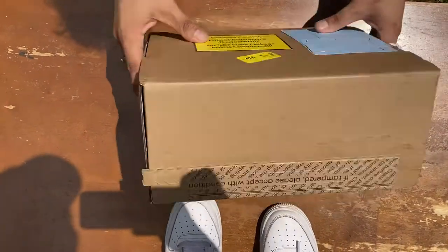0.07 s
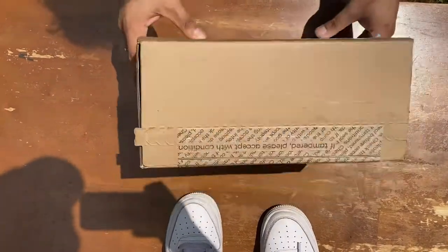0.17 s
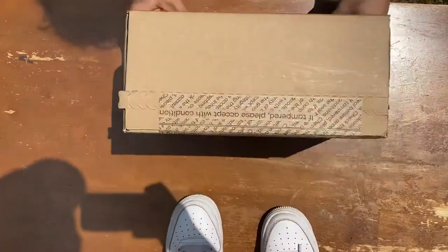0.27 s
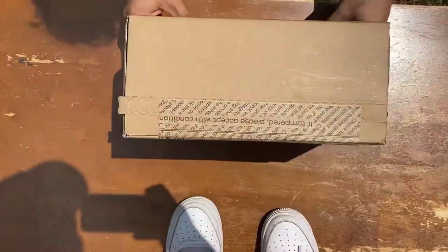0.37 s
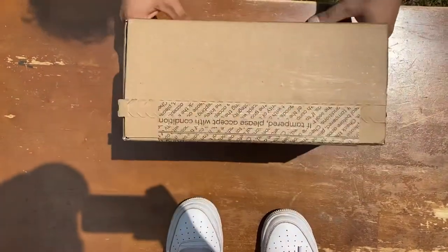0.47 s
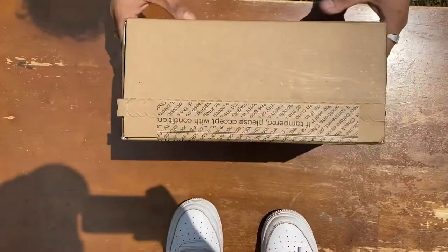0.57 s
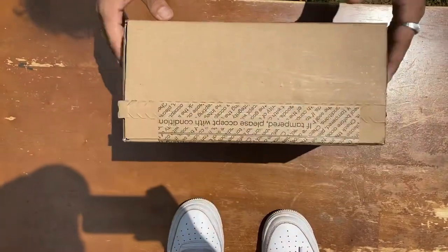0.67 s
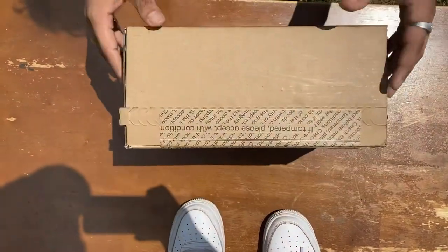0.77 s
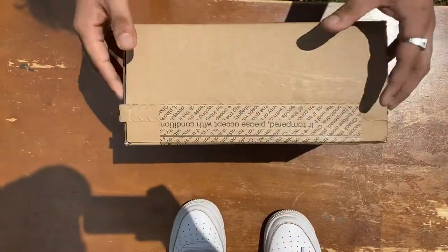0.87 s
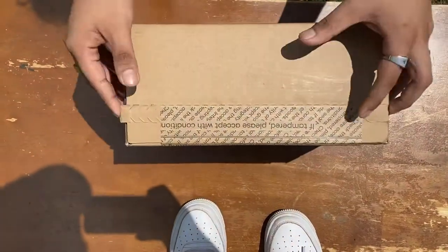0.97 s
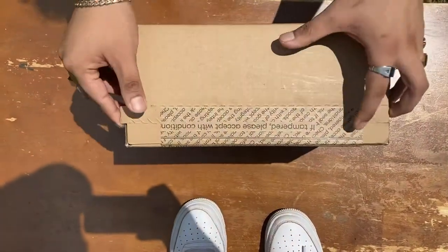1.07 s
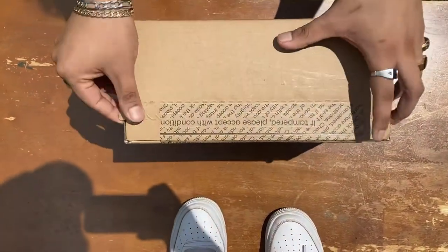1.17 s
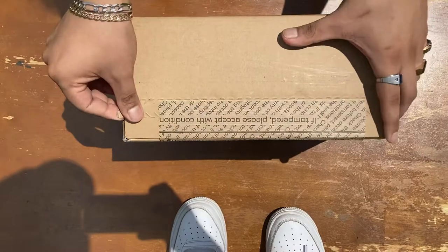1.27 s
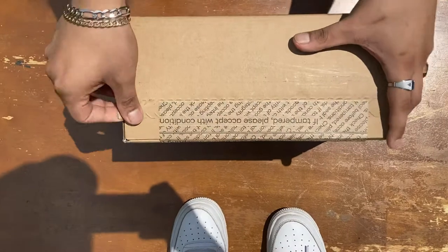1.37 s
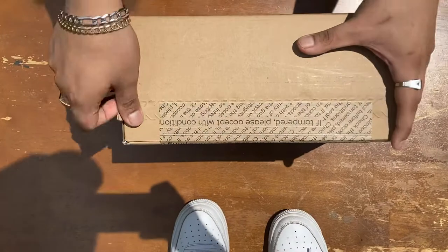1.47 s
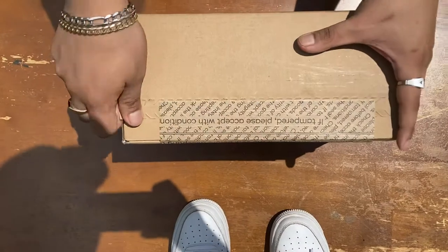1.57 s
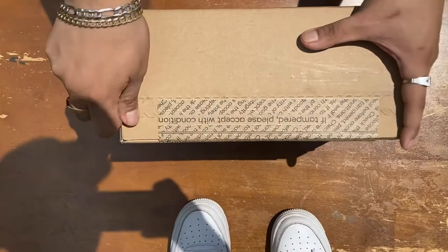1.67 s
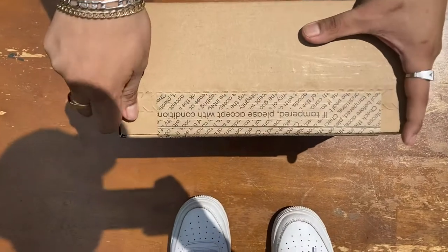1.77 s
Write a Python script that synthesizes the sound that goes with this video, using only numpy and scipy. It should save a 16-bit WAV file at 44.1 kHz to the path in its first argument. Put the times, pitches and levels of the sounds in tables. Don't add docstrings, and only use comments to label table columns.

```python
import sys
import numpy as np
from scipy import signal
from scipy.fft import rfft, irfft, next_fast_len
from scipy.io import wavfile
from scipy.ndimage import uniform_filter1d, map_coordinates

SR = 44100
rng = np.random.default_rng(int(sys.argv[2]) if len(sys.argv) > 2 else 0)


def unload_wav(signal):
    wavfile.write(
        sys.argv[1],
        SR,
        np.round(np.clip(np.atleast_2d(signal).T, -1, 1) * 32767).astype(np.int16),
    )


def gain_from_decibels(decibels):
    exponent = np.asarray(decibels, float) / 20
    return 10 ** exponent


N = 79380
TIME = np.arange(N) / SR


def unit(x):
    return x / np.sqrt(np.mean(x ** 2) + 1e-20)


def even(x, window_s):
    return x / np.sqrt(np.abs(uniform_filter1d(x ** 2, int(window_s * SR))) + 1e-6)


def along(points, hz):
    f, v = np.transpose(points)
    return np.interp(np.log(hz + 1), np.log(f + 1), v)


def closed(points, hz):
    low_end, high_end = (points[0][0] / 2, -90), (points[-1][0] * 2, -90)
    return gain_from_decibels(along([low_end, *points, high_end], hz))


def curves(rows):
    s, *columns = np.transpose(rows)
    return [np.interp(TIME, s, column) for column in columns]


def wobble(rate):
    return map_coordinates(rng.standard_normal(400), [TIME * rate])


def bell(middle_s, half_s):
    return np.exp(-((TIME - middle_s) / half_s) ** 2)


def filtered(x, response):
    m = next_fast_len(N + SR // 2)
    return irfft(rfft(x, m) * response(np.fft.rfftfreq(m, 1 / SR)), m)[..., :N]


def rush(spectrum, alike, patchy_db):
    z = signal.stft(rng.standard_normal((2, N)), nperseg=512)[2]
    field = uniform_filter1d(rng.standard_normal(z.shape[1:]), size=6, axis=0)
    field = uniform_filter1d(field, size=12, axis=1)
    pair = signal.istft(z * gain_from_decibels(patchy_db * unit(field)), nperseg=512)[1][:, :N]

    def response(hz):
        angle = np.arccos(np.clip(along(alike, hz), -1, 1)) / 2
        return closed(spectrum, hz) * [np.cos(angle), np.sin(angle)]

    mid, side = filtered(pair, response)
    return unit(np.array([mid + side, mid - side]))


# frequency in Hz, level in dB per Hz.
TOWN_SPECTRUM = [(300, 4.5), (600, -9.5), (850, -2), (1400, -8), (2300, -13), (3100, -15.5), (4500, -22),
                 (6200, -34)]
# frequency in Hz, left-right likeness from -1 to 1.
TOWN_COHERENCE = [(300, 0.31), (900, 0.077), (1500, 0.037), (4000, 0.095)]
# frequency in Hz, level in dB per Hz.
AIR_SPECTRUM = [(3000, -7), (5500, 7), (8000, 0), (11000, -3.5), (14000, -7.5), (15600, -14),
                (16000, -35.5)]
# frequency in Hz, level in dB per Hz.
VEHICLE_SPECTRUM = [(450, -3.5), (850, 3), (1150, -14)]


def distance():
    drift_db = .5
    town = gain_from_decibels(-51.5 + drift_db * wobble(5.6)) * rush(TOWN_SPECTRUM, TOWN_COHERENCE, patchy_db=.7)
    air = gain_from_decibels(-67 + drift_db * wobble(4.3)) * rush(AIR_SPECTRUM, [(100, 1)], patchy_db=1.2)
    swell = gain_from_decibels(-53.5) * bell(middle_s=1.48, half_s=0.18)
    return town + air + swell * rush(VEHICLE_SPECTRUM, TOWN_COHERENCE, patchy_db=1.0)


# time in seconds, pitch in Hz, level in dB.
WHISTLE_CURVE = [(.566, 2760, -73), (.58, 2840, -56.5), (.603, 2910, -53), (.645, 2930, -58.5),
                 (.67, 2903, -49.5), (.681, 2925, -51), (.688, 2997, -72.5), (.697, 2940, -57.5),
                 (.83, 2935, -68.5)]


def bird():
    hz, db = curves(WHISTLE_CURVE)
    phase = 2 * np.pi * np.cumsum(hz + 4 * wobble(55.3) + 22 * wobble(170)) / SR
    apart = 1.16 + 1.5 * bell(middle_s=0.639, half_s=0.03)
    ended_db = -60 * (TIME > WHISTLE_CURVE[-1][0])
    flutter_db = 4.4 * np.array([wobble(76.3), wobble(88.3)])
    return gain_from_decibels(db + ended_db + flutter_db) * np.sin([phase, phase + apart])


# time in seconds, strength in dB.
WIND_STRENGTH = [(0, -42.5), (.15, -37.5), (.32, -33), (.45, -43), (.58, -36), (.74, -43), (.8, -47.5),
                 (.95, -37.5), (1.3, -44), (1.55, -41.5), (1.8, -42)]
# middle in seconds, half length in seconds, level in dB, left-right in dB.
EDDY_EVENTS = [(0.072, 0.021, -36, -2), (0.135, 0.012, -31.5, 6), (0.165, 0.021, -39, -6),
               (0.309, 0.023, -23.5, -3), (0.352, 0.03, -30, 0), (0.496, .015, -39.5, 0),
               (0.557, 0.0095, -32.5, -5), (0.587, 0.026, -38, 4.5), (0.679, 0.011, -36.5, 3),
               (0.725, 0.01, -49, 7), (0.786, 0.016, -23.5, 9.5), (0.812, 0.011, -26, 17),
               (0.84, 0.026, -27, -1), (0.883, 0.017, -28, -4.5), (0.916, 0.016, -26.5, 3.5),
               (0.947, 0.025, -33.5, 14), (1.051, 0.016, -33, 12), (1.092, 0.011, -33, 27),
               (1.187, 0.013, -32, -5), (1.244, 0.027, -40, 15), (1.35, 0.043, -38, 19),
               (1.468, .012, -32, 16), (1.577, 0.012, -26.5, -10.5), (1.624, 0.019, -28.5, 13),
               (1.677, 0.0093, -30.5, 40), (1.771, 0.011, -33.5, 24)]
# frequency in Hz, level in dB per Hz.
RUMBLE_SPECTRUM = [(20, -34.5), (40, 4), (70, 5.5), (130, -1), (250, -13), (400, -25.5), (700, -42),
                   (1200, -41.5)]
# frequency in Hz, level in dB per Hz.
EDGE_SPECTRUM = [(120, -5), (250, 4.5), (400, -1), (700, -27.5)]


def wind():
    ports_alike = [(100, -0.49)]
    strength_db, = curves(WIND_STRENGTH)
    lumps_db = 1 * np.array([wobble(25.06), wobble(21)])
    flow = gain_from_decibels(0.5 + strength_db + lumps_db)
    ports = np.array([[.5], [-.5]])
    for s, half_s, db, pan_db in EDDY_EVENTS:
        flow = flow + gain_from_decibels(db - abs(pan_db) / 2 + ports * pan_db) * bell(s, half_s)
    rumble = even(rush(RUMBLE_SPECTRUM, ports_alike, patchy_db=2.5), window_s=0.0433)
    edges = even(rush(EDGE_SPECTRUM, ports_alike, patchy_db=4.5), window_s=0.029)
    edge_level = gain_from_decibels(-44) * (flow / gain_from_decibels(-28)) ** 1.74
    return flow * rumble + edge_level * edges


# start in seconds, peak in dB, length in ms,
# knock of the card under it in dB.
NAIL_TICKS = [
    (1.2307, -22.5, 1.42, -39.5),
    (1.2295, -32.5, 2.1, -50.5),
    (1.2325, -29, 3.2, -43.5),
    (1.2355, -38, 1.3, -49),
]
# frequency in Hz, level in dB per Hz.
TICK_SPECTRUM = [(4000, -19), (5500, -13), (7000, 8), (11000, -4.5), (15500, -1), (17000, -20)]
# start in seconds, peak in dB, length in ms, knock in dB.
TIP_PICKS = [(1.004, -51.5, 3.8, -64.5), (1.183, -58, 8.9, -70), (1.3235, -55, 2.5, -60),
             (1.3977, -50, 6.7, -62), (1.5893, -47.5, 2.5, -45), (1.592, -51, 2.7, -41.5),
             (1.6585, -59, 2.2, -65), (1.6903, -48.5, 6.7, -56), (1.696, -53, 5, -61),
             (1.7235, -45, 2.2, -47)]
# frequency in Hz, level in dB per Hz.
PICK_SPECTRUM = [(3500, -6), (5500, -1), (8500, 4), (12000, -1), (15300, -4), (15900, -37)]
# frequency in Hz, level in dB per Hz.
CARD_SPECTRUM = [(700, -3), (1300, -1), (2200, -3), (3300, 2.5), (4500, -9.5), (6000, -10.5)]
# middle in seconds, half length in seconds, level in dB.
SKIN_SLIDES = [(.0, 0.036, -63), (0.081, 0.17, -62.5), (0.283, 0.052, -61), (0.619, 0.12, -66),
               (0.749, 0.018, -58.5), (0.839, 0.059, -65), (1.066, 0.045, -69.5), (1.148, 0.015, -63),
               (1.192, 0.0085, -63), (1.278, 0.27, -67), (1.733, 0.09, -69.5)]
# frequency in Hz, level in dB per Hz.
SKIN_SPECTRUM = [(4000, -18), (7000, -7), (9500, -2), (12000, -7.5), (15500, -12.5), (16000, -39)]


def burst(start_s, length_ms):
    ms = (TIME - start_s) * 1000
    return gain_from_decibels(-20 * np.abs(ms) / np.where(ms > 0, length_ms, 0.21))


def snaps(rows, spectrum, noise):
    envelope = sum(gain_from_decibels(db) * burst(s, length_ms) for s, db, length_ms, _ in rows)
    return filtered(envelope * noise, lambda f: closed(spectrum, f))


def fingers():
    noise = rng.standard_normal(N) + gain_from_decibels(-7) * rng.standard_normal((2, N))
    picking = snaps(NAIL_TICKS, TICK_SPECTRUM, noise) + snaps(TIP_PICKS, PICK_SPECTRUM, noise)
    blows = sum(gain_from_decibels(db) * burst(s, 2.2 * length_ms) for s, _, length_ms, db in NAIL_TICKS + TIP_PICKS)
    knocks = 2 * filtered(blows * rng.standard_normal((2, N)), lambda f: closed(CARD_SPECTRUM, f))
    strokes = sum(gain_from_decibels(db) * bell(s, half_s) for s, half_s, db in SKIN_SLIDES)
    grain = rng.standard_normal(N) * gain_from_decibels(7.2 * uniform_filter1d(rng.standard_normal(N), size=30))
    sliding = strokes * unit(filtered(grain, lambda f: closed(SKIN_SPECTRUM, f)))
    return picking + knocks + sliding


# start in seconds, thud in dB,
# most excited pitch in Hz, crack in dB, left-right in dB.
BOX_LANDINGS = [(0.0681, -32.5, 2120, -61.5, 1.5), (.072, -38.5, 1400, -70, -1),
                (0.0766, -26.5, 283, -63.5, 2.5), (0.0837, -29.5, 270, -71, 0.5), (.112, -40, 330, -79, 7),
                (0.1955, -27, 700, -39.5, -3), (.1975, -32.5, 1900, -40, -0.5),
                (0.1992, -12.5, 322, -47, 1.5), (0.208, -16.5, 139, -68, 1.5),
                (0.2198, -19, 200, -67.5, 3.5), (0.2253, -17.5, 279, -65.5, 2.5),
                (0.229, -30.5, 1300, -64, -0.5), (.2325, -20, 198, -66, 2.5), (.251, -22.5, 203, -69, 3),
                (0.2579, -23, 1140, -60, -1.5), (.26, -18.5, 750, -57, 0.5), (0.2622, -8.5, 326, -56.5, 1),
                (0.2743, -23.5, 245, -70, 1), (0.2844, -24.5, 1290, -43, -3),
                (.288, -27, 1100, -52.5, -0.5), (0.2913, -13.5, 187, -56, 1.5), (.303, -22.5, 150, -65, 0),
                (.8045, -32, 350, -80.5, 4)]
# frequency in Hz, level in dB, 60 dB decay time in seconds.
BOX_MODES = [(124.3, 5, 0.092), (212, -1.5, 0.09), (234, -2.5, 0.098), (291.6, 1, 0.059),
             (378.6, -4.5, 0.057), (499, -3.5, 0.051), (554, -2, 0.048), (655, -7.5, 0.062),
             (864.6, -8, 0.053), (1195, -3.5, 0.027), (1400, -8.5, 0.035), (1634, -5.5, 0.033),
             (1943, -8.5, 0.021), (2365, -12, 0.016)]
FLAT_TIMES = [
    .094,
    .241,
    .311,
    .84,
]
# frequency in Hz, level in dB per Hz.
CRACK_SPECTRUM = [(1000, 3), (2300, -9), (3600, -1), (4600, -10.5), (8000, -6), (12000, -8.5),
                  (15600, -20.5), (16000, -45)]


def panel_modes(start_s, pitch_hz, t, chance):
    hz, level_db, t60 = np.transpose(BOX_MODES)[:, :, None]
    spread_oct, rise_cycles, choked_t60 = 0.79, 0.3, 0.031
    push = np.exp(-.5 * (np.log2(hz / pitch_hz) / spread_oct) ** 2)
    modes = push * gain_from_decibels(level_db + 1.5 * chance - 60 * t / t60)
    flat_s = min(end for end in FLAT_TIMES if end > start_s) - start_s
    modes = modes * gain_from_decibels(-60 * np.clip(t - flat_s, 0, None) / choked_t60)
    rattle = unit(uniform_filter1d(rng.standard_normal(modes.shape), size=120))
    modes = modes * (1 + .9 * np.clip(hz / 1000, 0, 1) ** 2 * rattle)
    return modes * (1 - np.exp(-t * hz / rise_cycles)) ** 2


def box():
    ring, crack = np.zeros((2, N + SR)), np.zeros((2, N + SR))
    t = np.arange(SR // 8) / SR
    hz = np.transpose(BOX_MODES)[0][:, None]
    crack_decay = gain_from_decibels(-60 * t / 0.019) + gain_from_decibels(-11 - 60 * t / 0.12)
    for s, thud_db, pitch_hz, crack_db, pan_db in BOX_LANDINGS:
        level, pan, start, detune, port = rng.standard_normal((5, len(BOX_MODES), 1))
        noise = rng.standard_normal(len(t))
        modes = panel_modes(s, pitch_hz, t, level)
        phase = 2 * np.pi * hz * (1 + .015 * detune * hz / 1000) * t + .25 * start
        here = slice(round(s * SR), round(s * SR) + len(t))
        for ear, sign in enumerate((.5, -.5)):
            port_phase = sign * 1.16 * port * hz / 1000
            tones = gain_from_decibels(sign * 3 * pan) * modes * np.sin(phase + port_phase)
            ring[ear, here] += gain_from_decibels(thud_db + sign * pan_db) * tones.sum(0)
            crack[ear, here] += gain_from_decibels(crack_db + sign * pan_db) * crack_decay * noise
    ringing = filtered(ring[:, :N], lambda f: 1 / (1 + (f / 3000) ** 8))
    return ringing + 2 * filtered(crack[:, :N], lambda f: closed(CRACK_SPECTRUM, f))


def scene():
    return distance() + bird() + wind() + fingers() + box()


TOP_HZ = 16650


def keep_stronger(hz, z):
    from_hz, bins = 4400, 16
    pair = np.array([z[0] + z[1], z[0] - z[1]]) / 2
    band = np.arange(len(hz)) // bins
    centre = band * bins + bins // 2 * (hz < TOP_HZ)
    power = uniform_filter1d(np.abs(pair) ** 2, size=bins, axis=1)[:, centre]
    power = uniform_filter1d(power, size=3, axis=2)
    jitter = unit(uniform_filter1d(rng.standard_normal(z.shape[1:]), size=3, axis=1))
    limit_db = -9 + 2.5 * jitter[band]
    kept = (power > gain_from_decibels(2 * limit_db) * power[::-1]) | (hz < from_hz)[:, None]
    mid, side = pair * kept
    return np.array([mid + side, mid - side])


def expand_spectrum(x):
    hz, _, z = signal.stft(x, SR, nperseg=2048, noverlap=1536)
    power = (np.abs(z) ** 2).sum(0)
    ratio = power / (np.abs(uniform_filter1d(power, size=9, axis=0)) + 1e-16)
    exponent = .6 / 2 * (hz > 600)
    z = keep_stronger(hz, z * ratio ** exponent[:, None])
    return signal.istft(z, SR, nperseg=2048, noverlap=1536)[1][:, :N]


# frequency in Hz, lag of the left in radians.
TREBLE_LAG = [(7400, np.pi), (8000, 4.04), (9500, 4.57), (10800, 2 * np.pi)]


def treble_turn(f):
    high = 1 / (1 + np.exp(-np.log((f + 1) / 4400) / .04))
    return 1 - high + high * np.exp(1j * along(TREBLE_LAG, f) * [[-.5], [.5]])


def phone_band(f):
    return (1j * f / (33.7 + 1j * f)) ** 2 / (1 + np.exp((f - TOP_HZ) / 40))


def roll_off(x):
    return signal.sosfilt(signal.butter(12, 16980, fs=SR, output="sos"), x)


def record(dry):
    x = filtered(dry, treble_turn)
    x = filtered(x, phone_band)
    return roll_off(expand_spectrum(x))


dry = scene()
out = record(dry)
unload_wav(out)
```